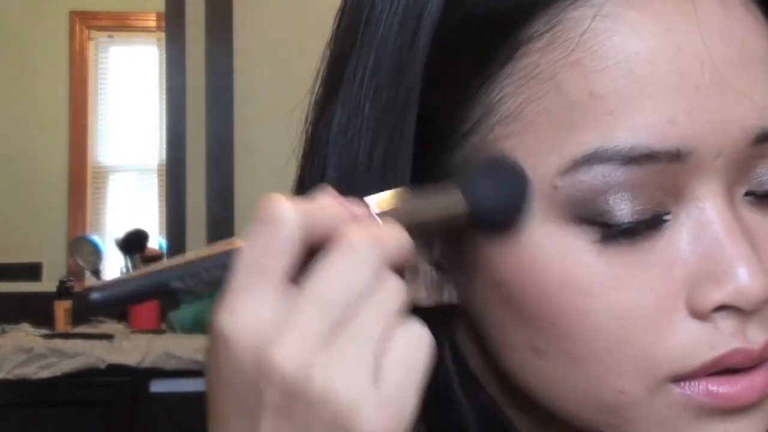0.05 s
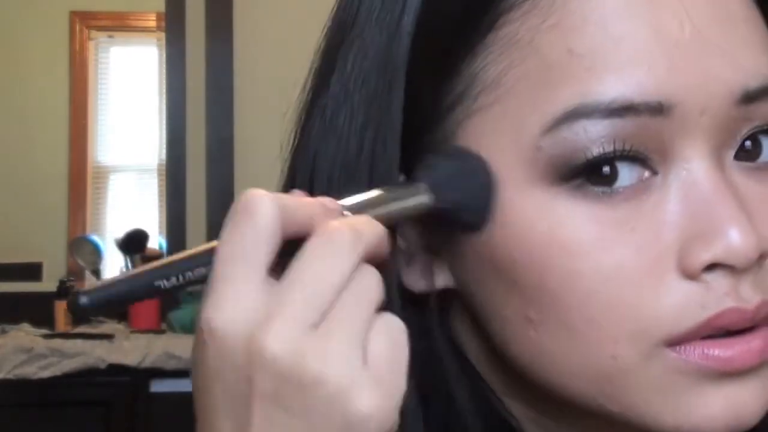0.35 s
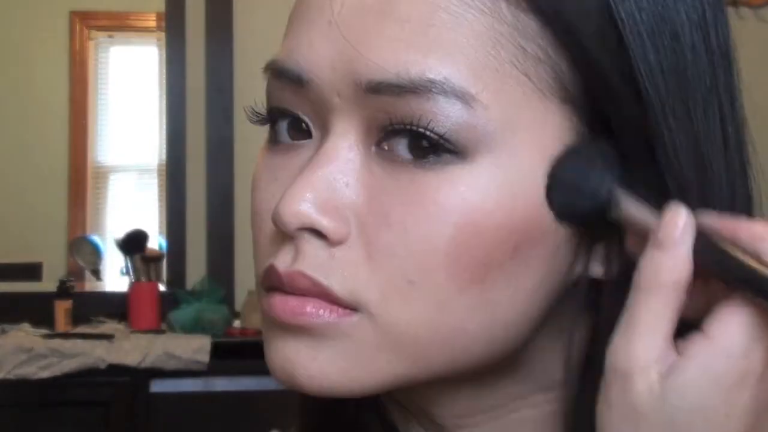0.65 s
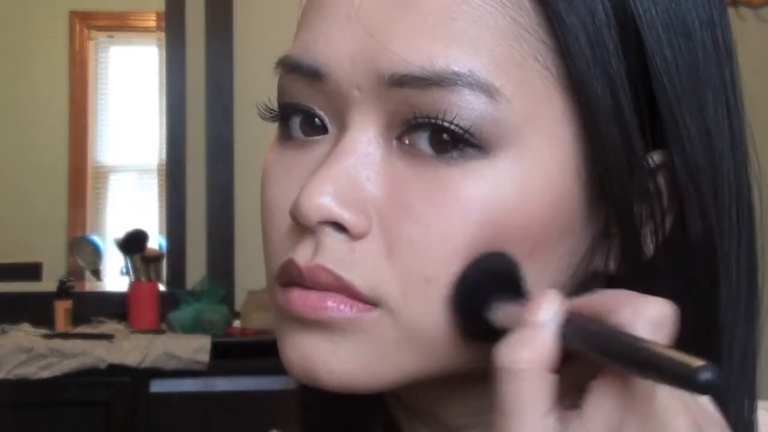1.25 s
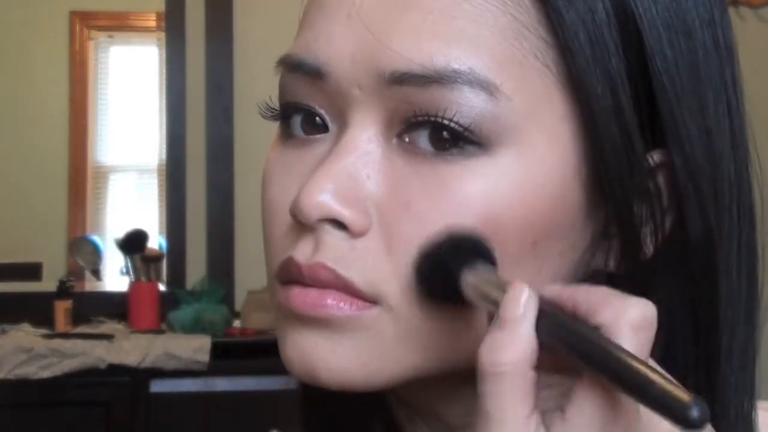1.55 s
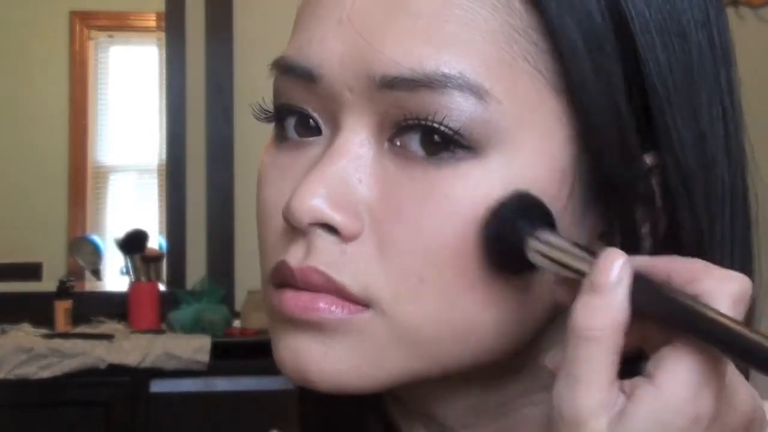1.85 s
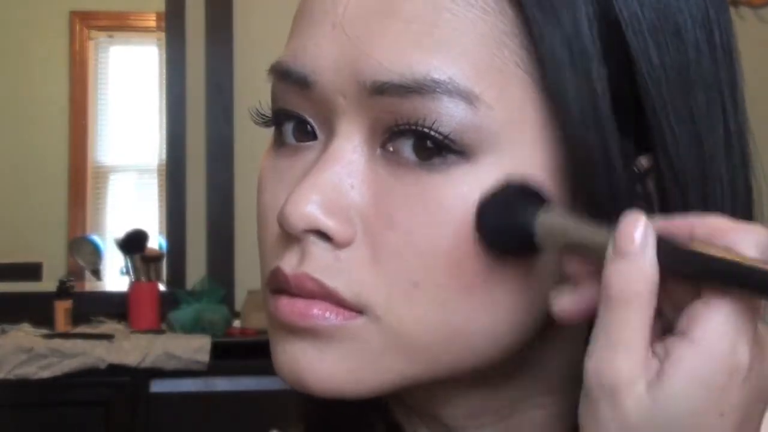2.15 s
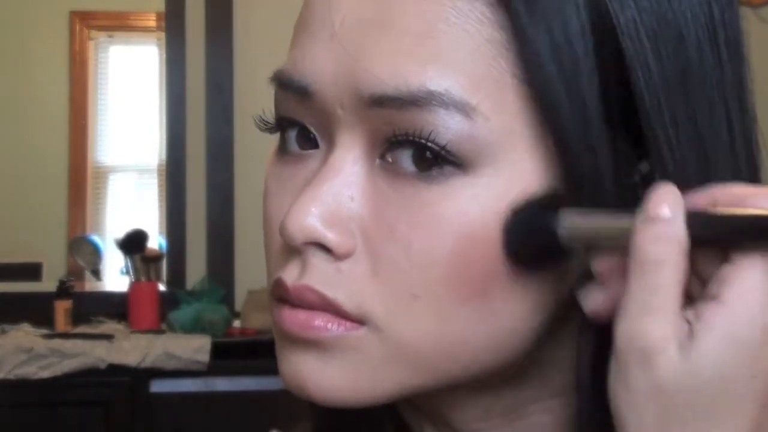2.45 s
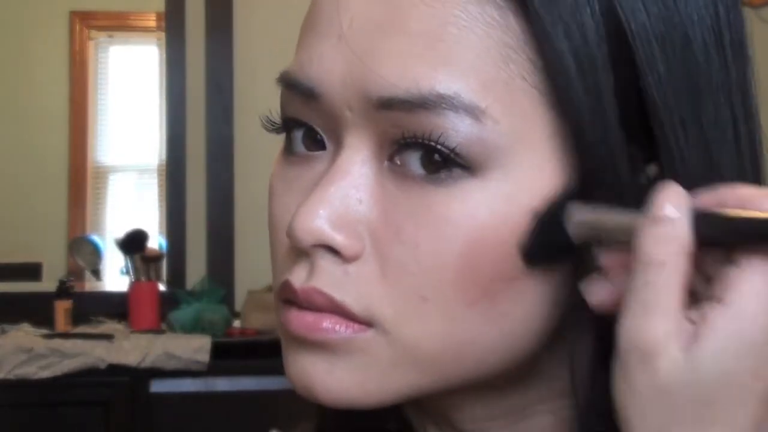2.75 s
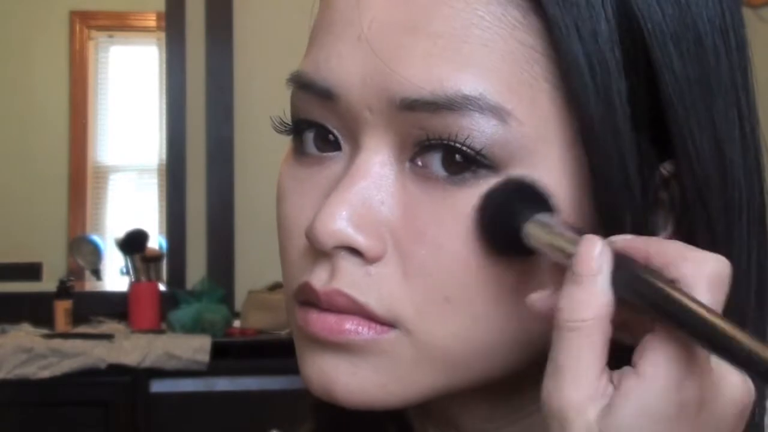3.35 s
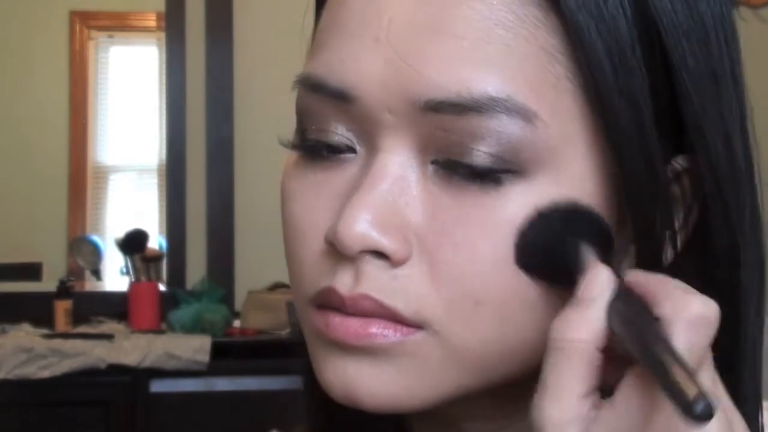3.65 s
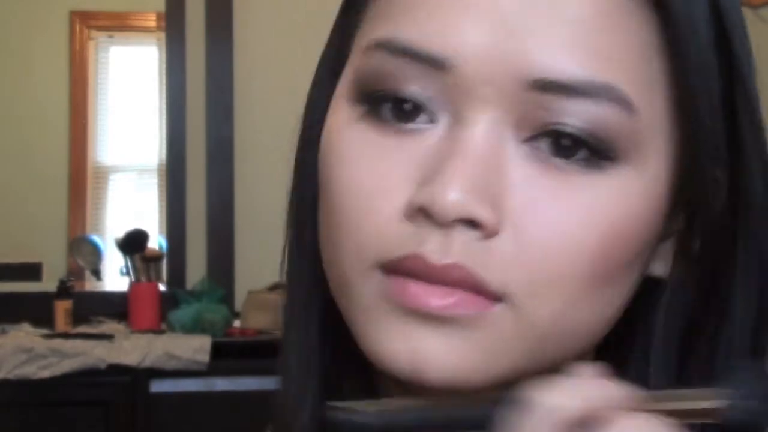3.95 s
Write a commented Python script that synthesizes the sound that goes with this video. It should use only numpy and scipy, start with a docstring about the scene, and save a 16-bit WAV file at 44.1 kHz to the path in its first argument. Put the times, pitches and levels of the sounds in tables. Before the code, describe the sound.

A make-up brush sweeps faintly over a cheek in short strokes for about four seconds, under steady room hum, fan-like rumble and microphone hiss. A low drone swells three times until 0.6 seconds, when everything briefly fades out and returns without it. A soft knock comes near 1.2 seconds, and the handle ticks lightly at 1.5 and 2.2 seconds. A hand rustles faintly now and then.

```python
"""A quiet room: mains hum, a fan-like rumble and microphone hiss run all the way through.
At first a low drone swells and sinks, and a soft make-up brush starts sweeping over a cheek,
with a rustle of hand and sleeve now and then. Near 0.6 s everything fades out and comes back
without the drone. The brushing goes on, with a soft knock near 1.2 s and two faint ticks
of the handle in the fingers near 1.5 s and 2.2 s."""
import sys
import numpy as np
from scipy import signal
from scipy.fft import rfft, irfft
from scipy.io import wavfile
from scipy.ndimage import uniform_filter1d

SR = 44100
rng = np.random.default_rng(int(sys.argv[2]) if len(sys.argv) > 2 else 0)


def generate_wav(signal):
    """Clip the signal to [-1, 1] and save it as 16-bit WAV at the path in sys.argv[1]."""
    frames = np.transpose(np.atleast_2d(signal))
    scaled = np.clip(frames, -1, 1) * 32767
    pcm = np.round(scaled).astype(np.int16)
    wavfile.write(sys.argv[1], SR, pcm)


N = 176400  # 4 seconds


def undb(db):
    """Turn decibels (dB) into a number to multiply by."""
    return 10 ** (np.asarray(db) / 20)


def unit(x):
    """Scale a signal so that its average strength (rms) is 1."""
    return x / np.sqrt(np.mean(x ** 2))


def noise(colour):
    """Noise whose strength from low to high follows rows of (Hz, dB per Hz)."""
    hz, db = np.array(colour, float).T
    freqs = np.maximum(np.fft.rfftfreq(N, 1 / SR), 1)
    gain = undb(np.interp(np.log(freqs), np.log(hz), db))
    return irfft(rfft(rng.standard_normal(N)) * gain, N) * np.sqrt(SR / 2)


def resonance(hz, width):
    """Noise that rings around one pitch; the smaller the width, the clearer the pitch."""
    distance = (np.fft.rfftfreq(N, 1 / SR) - hz) / (width / 2)
    return unit(irfft(rfft(rng.standard_normal(N)) / (1 + distance ** 2), N))


def wander(rate):
    """A random curve that glides to a new value `rate` times a second."""
    hold = max(int(SR / rate), 2)
    steps = np.repeat(rng.standard_normal(N // hold + 1), hold)
    return unit(uniform_filter1d(steps, hold)[:N])


def swells(t, moves):
    """A loudness curve with one smooth rise and fall for each movement."""
    return sum(undb(db) * np.cos(np.pi * np.clip((t - middle) / length, -.5, .5))
               for middle, length, db in moves)


def taps(t, hits, attack_s):
    """A loudness curve that jumps up at each light contact and quickly dies away."""
    return sum(undb(db) * np.clip((t - start) / attack_s, 0, 1) * np.exp(-np.maximum(t - start, 0) / decay)
               for start, db, decay in hits)


# The tones of the hum and its faint whine. Each row: pitch in Hz, level in dB.
HUM_TONES = [(120, -53), (299.5, -60), (447, -69), (952, -80), (1131, -81), (8392, -85), (8631, -85)]

def hum(t, waver_db=1.7):
    """Mains power and a motor give steady tones, each wavering a little in loudness."""
    tones = np.zeros(N)
    for hz, db in HUM_TONES:
        level = undb(db + waver_db * wander(rate=2.85))
        tones += level * np.sqrt(2) * np.sin(2 * np.pi * (hz * t + rng.random()))
    return tones


# The pitches at which the room rings. Each row: pitch in Hz, width in Hz, level in dB.
ROOM_RESONANCES = [(48.7, 11, -74), (87.7, 11, -69.5), (135.6, 9.6, -54.5), (157.5, 8.5, -58),
                   (191.2, 12, -60), (240, 29, -57.5), (266, 20, -59.5), (299.2, 14, -54.5),
                   (372.5, 18, -72), (402.1, 14, -66.5), (435.5, 26, -65), (520, 26, -71), (566.6, 20, -76),
                   (635, 12, -80.5)]
# The deep, fan-like rumble. Each row: frequency in Hz, level in dB per Hz.
RUMBLE_COLOUR = [(15, -102), (30, -97), (75, -95), (125, -78), (210, -81.5), (315, -81), (350, -90),
                 (460, -88.5), (620, -97.5), (1200, -104), (3000, -118)]
# The soft rush of air from all around. Each row: frequency in Hz, level in dB per Hz.
AIR_COLOUR = [(20, -110), (150, -108), (195, -97), (280, -91.5), (800, -91.5), (1300, -95), (2500, -99),
              (6000, -106.5), (7500, -108), (9000, -120), (16000, -130)]

def room():
    """A rumble makes the room ring, alike in both ears; each ear gets its own air noise."""
    ringing = sum(undb(db) * resonance(hz, width) for hz, width, db in ROOM_RESONANCES)
    return ringing + noise(RUMBLE_COLOUR) + np.array([noise(AIR_COLOUR), noise(AIR_COLOUR)])


# The microphone's own hiss. Each row: frequency in Hz, level in dB per Hz.
HISS_COLOUR = [(500, -104), (2500, -102), (4500, -100), (7000, -99.5), (9000, -100), (11500, -101.3),
               (16000, -101.8)]

def hiss(whistle_hz=7410, width_hz=330, whistle_db=-72.5, flicker_db=5.5):
    """The microphone hisses evenly, with a faint, high whistle that flickers."""
    flicker = unit(undb(flicker_db * wander(rate=80)))
    centre, left, right = (resonance(whistle_hz, width_hz) for _ in range(3))
    whistle = centre + 0.27 * np.array([left, right])  # spread a little to the sides
    return noise(HISS_COLOUR) + undb(whistle_db) * flicker * whistle


# The rough noise in the drone. Each row: pitch in Hz, width in Hz, level in dB relative to the tone.
DRONE_ROUGHNESS = [(298, 24, -5), (251, 18, -7.5), (199, 24, -9.5), (401.4, 16, -13)]
# How loud the drone's tone is as time passes. Each row: time in seconds, level in dB.
DRONE_LOUDNESS = [(0, -59.5), (.13, -43.5), (.22, -60), (.30, -47.5), (.39, -53), (.46, -44), (.57, -47)]
DIP_S = 0.6177  # the drone stops here, at the bottom of a brief dip in the whole sound

def drone(t, pitch_hz=278.4):
    """A low tone wrapped in rough noise swells three times, then stops."""
    tone = np.sqrt(2) * np.sin(2 * np.pi * (pitch_hz * t + rng.random()))
    rough = sum(undb(db) * resonance(hz, width) for hz, width, db in DRONE_ROUGHNESS)
    times, levels_db = np.array(DRONE_LOUDNESS).T
    return undb(np.interp(t, times, levels_db)) * (t < DIP_S) * (tone + rough)


# The strokes of the brush. Each row: middle in seconds, length in seconds, peak level in dB.
BRUSH_STROKES = [(0.095, .11, -61.5), (0.253, 0.18, -59.5), (0.35, 0.086, -60), (0.53, 0.22, -59),
                 (0.787, .22, -61.5), (1.037, .16, -61.5), (1.21, .14, -61.5), (1.546, 0.093, -70),
                 (1.875, 0.049, -61), (2.13, 0.048, -60), (2.305, .1, -64), (2.438, .09, -59.5),
                 (2.555, .06, -63), (2.708, 0.27, -62.5), (3.01, 0.21, -60), (3.20, 0.26, -62.5),
                 (3.35, .15, -60.5), (3.58, 0.29, -61.5), (3.80, 0.29, -63)]
# The bright swish of bristles on skin. Each row: frequency in Hz, relative level in dB.
BRISTLE_COLOUR = [(500, -22), (2500, -18), (4500, -3), (6300, -2), (7500, 2.5), (9000, -2), (11500, -9),
                  (16000, -24)]

def brush(t, grain_db=2.5):
    """Each stroke swells and fades; bristles catching on the skin make it grainy."""
    grain = undb(grain_db * wander(rate=300))
    return swells(t, BRUSH_STROKES) * unit(noise(BRISTLE_COLOUR) * grain)


# The movements of the hand. Each row: middle in seconds, length in seconds, peak level in dB.
HAND_MOVES = [(0.137, .16, -63.5), (2.37, .07, -61), (3.08, .06, -62.5), (3.97, .14, -64)]
# The duller sound of hand and sleeve. Each row: frequency in Hz, relative level in dB.
SLEEVE_COLOUR = [(300, -10), (900, -4.5), (1500, 0.5), (2200, -4.5), (3500, -8), (8000, -26)]

def rustle(t):
    """The hand and sleeve rustle faintly as they move."""
    return swells(t, HAND_MOVES) * unit(noise(SLEEVE_COLOUR))


# The soft knock. Each row: start in seconds, level in dB, time to die down in seconds.
SOFT_KNOCKS = [(1.165, -51.5, 0.025)]
# The knock's mid-pitched sound. Each row: frequency in Hz, relative level in dB.
SOFT_KNOCK_COLOUR = [(300, -20), (1100, -10), (1550, 3.5), (2300, 1.5), (3200, -16), (6000, -5),
                     (9000, -24), (16000, -34)]

def knock(t):
    """Handling the brush gives one soft bump, a short burst of noise."""
    return taps(t, SOFT_KNOCKS, attack_s=0.0024) * unit(noise(SOFT_KNOCK_COLOUR))


# The handle's ticks. Each row: start in seconds, level in dB, time to die down in seconds.
HANDLE_TICKS = [(1.528, -39, 0.0018), (2.1950, -43.5, .0028)]
# The thin, high sound of a tick. Each row: frequency in Hz, relative level in dB.
HANDLE_COLOUR = [(500, -27), (2500, -19), (4300, -3), (5500, -18), (7200, 7), (8500, -10), (11000, -16),
                 (16000, -30)]

def ticks(t):
    """The handle ticks in the fingers: tiny, sharp bursts that die away at once."""
    return taps(t, HANDLE_TICKS, attack_s=0.00033) * unit(noise(HANDLE_COLOUR))


def scene():
    """Add all the sounds in stereo, with the brush in the middle."""
    t = np.arange(N) / SR
    return hum(t) + room() + hiss() + drone(t) + brush(t) + rustle(t) + knock(t) + ticks(t)


def record(dry):
    """Fade everything out and back in around DIP_S, and cut off the very highest treble."""
    fade_s, floor_db, top_hz = 0.1, -45, 15750
    t = np.arange(N) / SR
    dip = np.clip(np.abs(t - DIP_S) / fade_s, undb(floor_db), 1)
    treble_cut = signal.ellip(12, .1, 70, top_hz, fs=SR, output="sos")
    return signal.sosfilt(treble_cut, dry * dip)


dry = scene()
out = record(dry)
generate_wav(out)
```